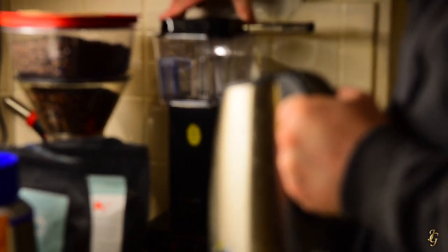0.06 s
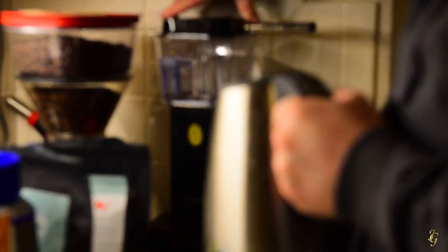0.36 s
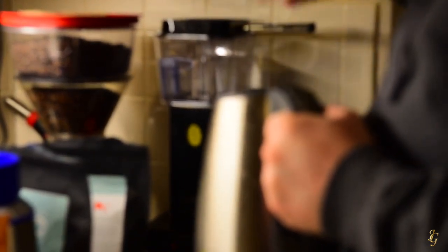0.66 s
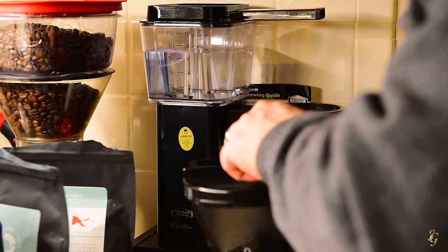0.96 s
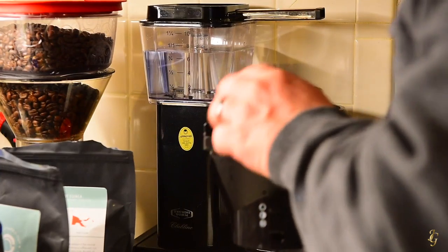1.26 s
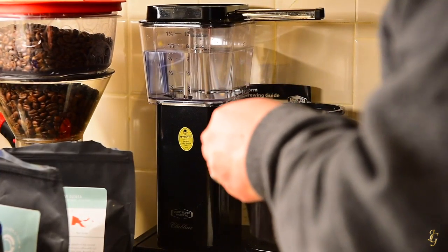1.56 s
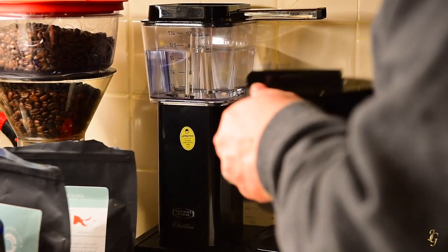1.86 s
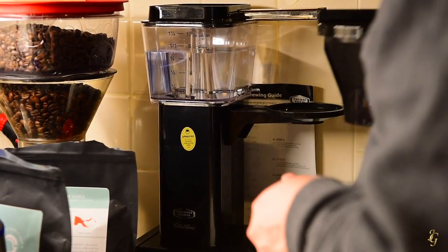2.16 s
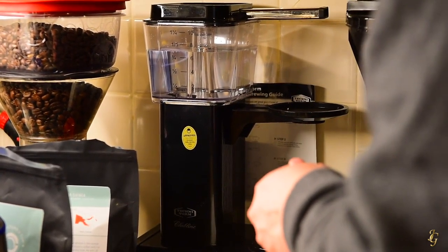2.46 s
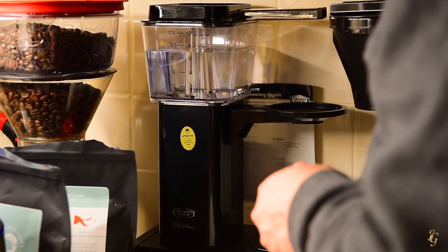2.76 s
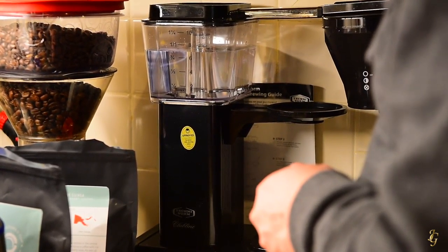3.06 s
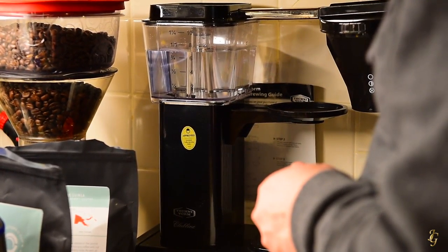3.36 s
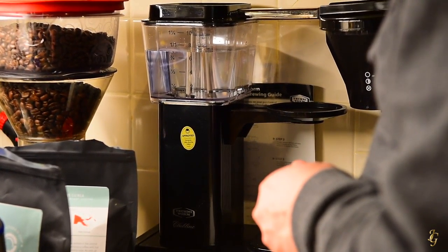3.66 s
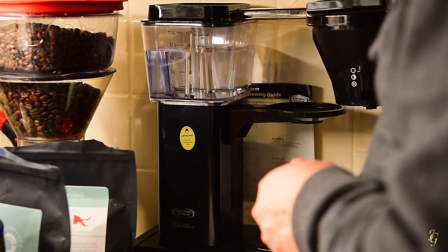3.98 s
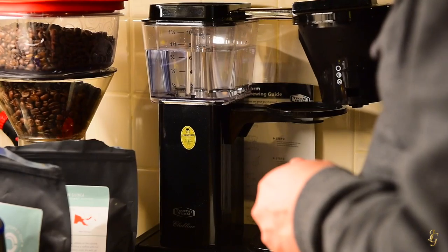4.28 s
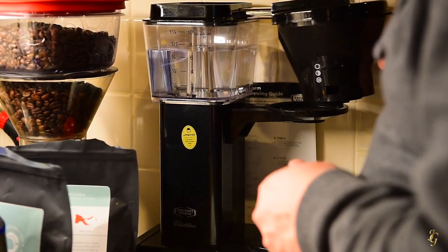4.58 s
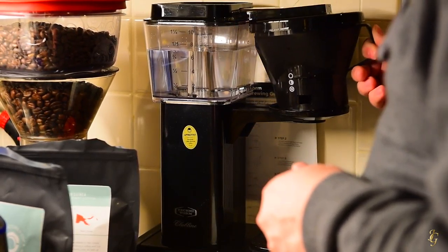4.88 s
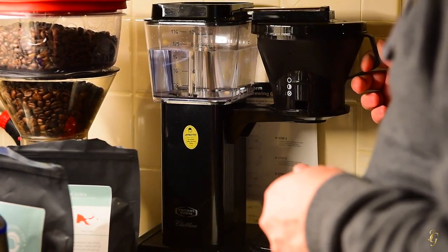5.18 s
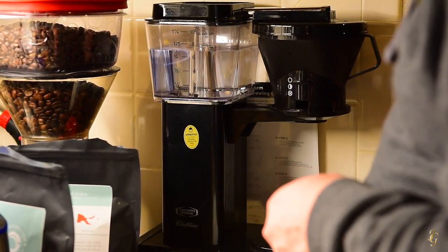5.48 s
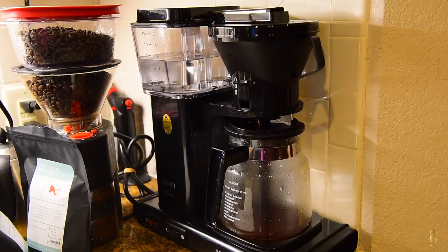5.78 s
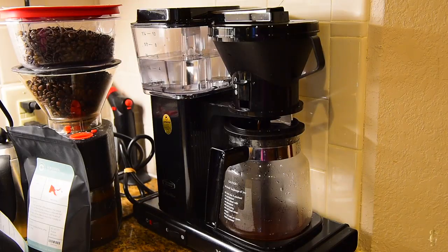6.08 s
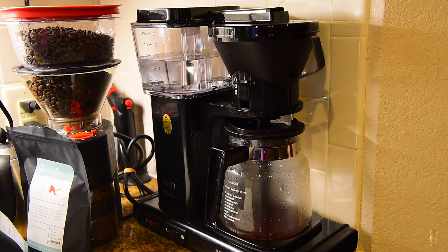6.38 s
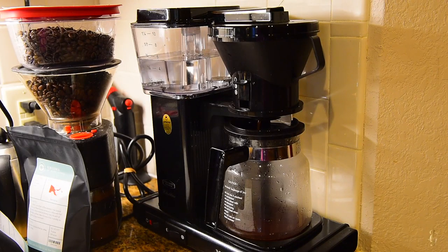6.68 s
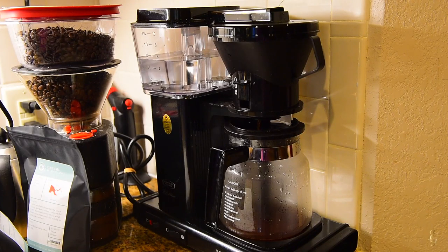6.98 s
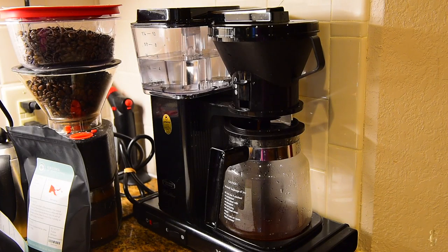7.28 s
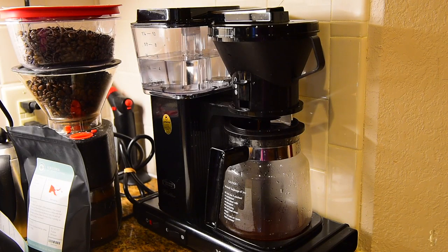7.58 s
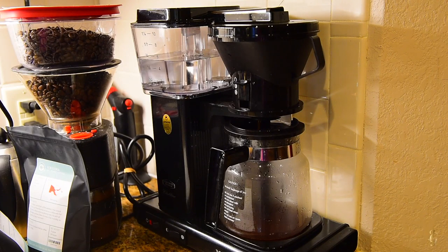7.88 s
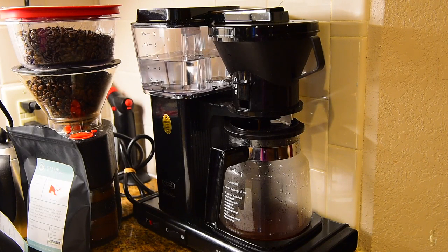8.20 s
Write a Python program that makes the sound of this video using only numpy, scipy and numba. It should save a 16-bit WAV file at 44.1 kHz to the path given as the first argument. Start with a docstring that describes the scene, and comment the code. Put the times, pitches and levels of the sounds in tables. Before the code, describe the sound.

A coffee maker is handled close to the microphone in a small kitchen, with a short tiled echo and a low appliance hum throughout. For the first second or so, a sleeve rubs faintly and a plastic lid gives a few light knocks. From 1.5 to 3 seconds, a hollow plastic part clacks and rattles loudly, densest around 2 seconds, then thinning out. From 3.5 seconds the filter basket slides into place with sharp ticks and fine, slightly ringing scraping, strongest near 4 seconds and fading by 5.4. A soft bump comes at 6 seconds, followed by a small click. At 6.3 seconds a valve snaps open with a bright, spattering hiss of spray lasting under half a second. After a brief gap, a second burst starts near 7 seconds and holds steadily until the end at about 8.4, with the vessel faintly ringing and gurgling.

```python
"""A sleeve rubs and a lid knocks as someone handles a coffee maker, close by in a small kitchen.
A hollow part clacks and rattles, then the filter basket scrapes and ticks into place.
After a soft bump, a valve lets out two hissing bursts of spray that make the vessel ring and gurgle.
Tiled walls add a short echo, and an appliance hums low underneath it all."""
import sys
import numpy as np
from scipy import signal
from scipy.fft import rfft, irfft, next_fast_len
from scipy.io import wavfile
from numba import njit

SR = 44100
rng = np.random.default_rng(int(sys.argv[2]) if len(sys.argv) > 2 else 0)


def waveform_to_disk(signal):
    """Save audio, clipped to [-1, 1], as 16-bit WAV at the path in sys.argv[1]."""
    frames = np.transpose(np.atleast_2d(signal))
    scaled = np.clip(frames, -1, 1) * 32767
    samples = np.round(scaled).astype(np.int16)
    wavfile.write(sys.argv[1], SR, samples)


N = 367794
T = np.arange(N) / SR

# Table levels are relative: the functions add their own gains. A t60 is the time to fade by 60 dB.
# loud clacks of the hollow part: start_s, crack_db, ring_db
PART_CLACKS = [(1.481, 2.5, -17.5), (1.6761, -3, -9.5), (1.6995, -7, -22), (1.7662, -2.5, -14.5),
               (1.8015, -1, -23), (1.8164, -8, -15), (1.8532, -5, -18), (1.9091, -1.5, -9.5),
               (1.942, -11, -16), (1.9954, -6, -9.5), (2.0564, -20, -14), (2.0682, -2, -7),
               (2.1221, -6, -8.5), (2.1664, -15, -12), (2.3078, -11.5, -16), (2.4098, -5.5, -12),
               (2.5187, -18, -17), (2.5316, -5.5, -13), (2.7038, -6, -19), (2.7833, -14.5, -25.5),
               (2.8204, -12, -14.5), (2.8564, -6.5, -22.5), (2.9098, -8, -32), (2.9765, -9.5, -22),
               (2.9884, -11, -23), (3.0385, -18, -31), (3.0834, -17, -24.5), (3.1242, -17, -52),
               (3.2176, -22, -54), (6.1953, -36, -38), (6.2848, -19, -27.5)]
# spells of shaking: start_s, end_s, level_db, fade_db_per_s
PART_SHAKES = [(1.69, 2.136, -15.5, 153), (2.404, 2.58, -33.5, 106), (2.727, 3.02, -23.5, 86)]
# tone of a sharp crack: pitch_hz, level_db
CRACK_TONE = [(200, -51), (1400, -19.5), (2100, -2.5), (3000, -7.5), (3900, 11), (5200, 2), (7000, 4),
              (9500, 2), (11500, -1), (15000, -17)]
# pitches that ring out or are hollowed out in the rattle: pitch_hz, width_hz, gain_db
RATTLE_BANDS = [(2267, 200, 18.5), (3690, 57, 6), (4270, 250, -14), (6150, 94, -14), (9040, 280, 1.5)]
# notes the hollow body rings with: pitch_hz, level_db, t60_s
BODY_NOTES = [(2098, -15.5, 0.083), (2247, 4, 0.034), (2390, 1, 0.025), (2520, -7.5, 0.013),
              (3720, -14, 0.015), (4020, 6, 0.0066), (4430, -34, 0.0218), (5900, -12.5, 0.034),
              (6670, -18, 0.034), (8500, -24, 0.014)]


def hollow_part(crack_db=-6, ring_db=7, rattle_db=-5, detune=0.017):
    """Each clack is a sharp crack plus a short ring of the body; shaking adds bounces and a rattle."""
    shaking = sum(amp(db) * swell(start, end, 0.0034, fade) for start, end, db, fade in PART_SHAKES)
    bounce_s, bounce_db = catches(PART_SHAKES[0][0], PART_CLACKS[-1][0], shaking, spread_db=0.5, count=48)
    bounces = np.transpose([bounce_s, bounce_db + 2, bounce_db - 5])  # more crack, less ring
    clacks = np.vstack([PART_CLACKS, bounces])
    cracks = blows(clacks[:, 0], clacks[:, 1] + crack_db, t60_s=0.051, rise_s=0.00049, patchy_db=5)
    hz, db, t60_s = np.transpose(BODY_NOTES)[:, :, None]
    age, rings = T[:SR // 8], np.zeros((2, N))
    fade = amp(db) * die_away(age, t60_s) * (1 - np.exp(-age / 0.0022))
    for start_s, _, body_db in clacks:
        # each clack is tuned a little differently; high notes reach left and right out of step
        mistune, skew = rng.standard_normal((2, len(hz), 1))
        phase = 2 * np.pi * hz * (1 + detune * mistune) * age
        shift = skew * hz / 5000
        ring = np.array([np.sum(fade * np.sin(phase + side * shift), axis=0) for side in (1, -1)])
        start = int(start_s * SR)
        rings[:, start:start + len(age)] += amp(body_db + ring_db) * ring
    rattle = colour(grains(per_s=180, spread_db=0.5, t60_s=0.04) * shaking, CRACK_TONE, RATTLE_BANDS)
    return colour(cracks, CRACK_TONE) + rings + amp(rattle_db) * rattle


# how hard the basket is pushed: time_s, level_db
BASKET_PUSH = [(3.45, -60), (3.78, -30), (3.79, -17), (4.15, -24.5), (4.81, -26), (5.37, -41), (5.59, -61),
               (5.75, -49.5), (6.0, -74)]
# loud ticks of the basket: start_s, level_db, treble_db
BASKET_TICKS = [(3.532, -33, -32), (3.614, -16, -23.5), (3.6536, -16.5, -39), (3.705, -13.5, -50),
                (3.748, -13.5, -24), (3.7876, -11, -13), (3.813, 4.5, -13), (3.845, -0.5, -20),
                (3.8683, -4, -11), (3.91, 0.5, -14), (3.9402, 1, -10), (3.9763, 1.5, -14),
                (4.0405, -1, -14.5), (4.1553, -6.5, -18), (4.3231, -28, -14.5), (4.3562, -5.5, -16),
                (4.523, -5.5, -19), (4.5872, -8, -22), (4.784, -6, -20), (4.9034, -10.5, -20.5),
                (5.133, -28, -19), (5.2133, -12, -28), (5.2835, -15, -29), (5.351, -18, -32),
                (5.7522, -35, -33.5), (5.933, -41, -36)]
# tones of a tick, its bright snap and the scraping: pitch_hz, level_db
TICK_TONE = [(200, -33), (1000, -38.5), (2000, -8), (3200, -3), (5500, 2.5), (7200, -1), (9000, -12),
             (15000, -55)]
SNAP_TONE = [(2000, -43), (6500, -6.5), (9200, 5.5), (12500, 2.5), (15500, -14)]
SCRAPE_TONE = [(200, -39), (1000, -12.5), (2000, -6.5), (3200, -10.5), (4200, -0.5), (7000, -1.5),
               (9400, 3.5), (12500, -0.5), (15500, -12.5)]
# pitches that stand out in a tick: pitch_hz, width_hz, lift_db
TICK_PEAKS = [(2220, 92, 11), (2650, 300, 5.2), (3650, 41, 5.9), (4120, 210, 5.6), (5600, 730, 4.4),
              (6430, 81, 8.7)]


def basket(tick_db=-7, snap_db=4, grit_db=-5.5, ping_db=-8, glide_start_s=3.7):
    """The sliding basket catches in sharp ticks and scrapes finely between them."""
    push = amp(np.interp(T, *np.transpose(BASKET_PUSH), left=-120, right=-120))
    catch_s, catch_db = catches(glide_start_s, BASKET_TICKS[-1][0], push, spread_db=7.5, count=44)
    light_ticks = np.transpose([catch_s, catch_db + 11, catch_db + 2])
    times, body_db, treble_db = np.vstack([BASKET_TICKS, light_ticks]).T
    ticks = blows(times, body_db + tick_db, t60_s=0.031, rise_s=0.00096, patchy_db=2.5)
    snaps = blows(times, treble_db + snap_db, t60_s=0.019, rise_s=0.0001, patchy_db=1.5)
    grit = amp(grit_db) * grains(per_s=390, spread_db=7.5, t60_s=0.012)
    tinkle = amp(ping_db) * pings(per_s=4000, spread_db=3.5, t60_s=0.041)
    scrape_peaks = [(2180, 240, 12.5), (2810, 350, 4), (3780, 440, 5.8)]
    scrape = colour((grit + tinkle) * push, SCRAPE_TONE, scrape_peaks)
    return colour(ticks, TICK_TONE, TICK_PEAKS) + colour(snaps, SNAP_TONE) + scrape + basket_wall(push)


# pitches the basket wall sings at: pitch_hz, width_hz, lift_db
SINGING_PEAKS = [(2166, 156, 19.2), (3950, 110, 16), (4814, 200, 11), (5800, 410, 18), (8300, 570, 5.9)]


def basket_wall(push, level_db=-24, seated_s=4.8, rise_db_per_s=26):
    """Light rubbing makes the basket wall sing, more freely as it nears its seat."""
    rubbing = push ** 0.53 * amp(level_db - rise_db_per_s * np.maximum(seated_s - T, 0))
    tone = [(300, -12), (1500, 7), (6000, 2.5), (11000, 8), (15000, -7)]
    return colour(grains(per_s=110, spread_db=1.5, t60_s=0.011) * rubbing, tone, SINGING_PEAKS)


# bursts from the valve: open_s, close_s, level_db, fall_db_per_s, closing_fade_s
SPRAY_BURSTS = [(6.333, 6.721, -7.5, 6, 0.053), (6.946, 8.4, -8.5, 1.08, .05)]
# tone of the jet: pitch_hz, level_db
JET_TONE = [(30, -24), (100, -23), (280, -30.5), (450, -19), (900, -9.5), (1600, -9), (2500, -2.5),
            (4000, 1.5), (7500, 3.5), (10300, 4.5), (12000, -3.5), (14000, -5), (15500, -13.5)]
# pitches the vessel lifts in the hiss: pitch_hz, width_hz, lift_db
HISS_PEAKS = [(530, 71, 7), (614, 49, 1.4), (1940, 54, 10.6), (2850, 31, 6.1), (3900, 170, 2.8),
              (4830, 78, 1), (5480, 66, 2.7), (5940, 160, 2.5), (9430, 150, 1.5)]


def spray(seep_s=6.064, seep_db=-56.5, seep_db_per_s=58, flutter_db=1.33, spatter_db=-7, ring_db=-3.5):
    """The valve seeps, then snaps open; the jet hisses and spatters, fading as the pressure drops."""
    seep = (T > seep_s) * (T < SPRAY_BURSTS[0][0]) * amp(seep_db + seep_db_per_s * (T - seep_s))
    flow = np.zeros(N)
    for open_s, close_s, db, fall_db_per_s, fade_s in SPRAY_BURSTS:
        age = np.maximum(T - open_s, 0)
        opening = 1 - np.exp(-age / 0.00044)
        closing = np.exp(-np.maximum(T - close_s, 0) / fade_s)
        flow += opening * amp(db - fall_db_per_s * age) * closing
    hiss = air() * amp(flutter_db * wander(per_s=32))
    drops = amp(spatter_db) * grains(per_s=2500, spread_db=2.5, t60_s=0.012)
    jet = (flow + seep) * colour(unit(hiss + drops), JET_TONE, HISS_PEAKS)
    return jet + amp(ring_db) * flow ** 0.76 * vessel()


# notes of the vessel's mouth, air space, wall and whistle: pitch_hz, width_hz, level_db, growth_db_per_s
VESSEL_NOTES = [(586, 98, -26, -2.5), (1263, 113, -33, 5), (1884, 170, -20.5, 2), (3305, 145, -20.5, 4)]
# air pockets where the jet lands: start_s, length_s, from_hz, to_hz, level_db
AIR_POCKETS = [(6.38, 0.2, 990, 1030, -20.5), (6.522, 0.21, 1960, 2200, -16.5),
               (6.956, 0.35, 960, 1210, -20.5), (8.134, 0.27, 830, 810, -17.5)]


def vessel():
    """The vessel's notes grow or fade as it fills, and air pockets add short gliding gurgles."""
    filling_s = np.maximum(T - SPRAY_BURSTS[0][0], 0)
    out = sum(amp(db + growth * filling_s) * breathy_note(hz, width)
              for hz, width, db, growth in VESSEL_NOTES)
    for start_s, length_s, from_hz, to_hz, db in AIR_POCKETS:
        progress = np.clip((T - start_s) / length_s, 0, 1)
        pitch_hz = from_hz + (to_hz - from_hz) * progress
        out += amp(db) * np.sin(np.pi * progress) * breathy_note(pitch_hz, width_hz=110)
    return out


# knocks on the lid and casing: start_s, contact_db, ring_db
LID_KNOCKS = [(0.36, -30.5, -60), (0.473, -30, -62), (0.5303, -13.5, -27), (0.805, -27, -49),
              (0.972, -17.5, -40), (1.154, -24.5, -42), (2.353, -26, -34.5), (3.355, -30, -53),
              (3.585, -17, -41)]
# tone of a knock: pitch_hz, level_db
KNOCK_TONE = [(150, -33), (550, -20), (800, -3), (1050, -9), (1700, -5.5), (2300, -10.5), (3200, -8),
              (5000, -11), (9000, -20), (15000, -29)]
# pitches that stand out in a knock: pitch_hz, width_hz, lift_db
KNOCK_PEAKS = [(795, 100, 2.3), (980, 100, 2.8), (1400, 87, 3.6), (2180, 370, 7.7), (3520, 600, 2.9)]
# notes the lid rings with: pitch_hz, level_db, t60_s
LID_NOTES = [(778, -8.5, 0.096), (1028, -0.5, 0.097), (1210, -11, 0.07), (1433, -6, 0.074),
             (2050, -5, 0.046), (3520, -10, 0.04)]


def lid(knock_db=-5):
    """Each knock is a short dull contact plus the hollow ring of the lid."""
    times, contact_db, ring_db = np.transpose(LID_KNOCKS)
    contacts = blows(times, contact_db + knock_db, t60_s=0.036, rise_s=0.00061, patchy_db=2.5)
    age, taps = T[:SR // 4], np.zeros(N)
    taps[(times * SR).astype(int)] = amp(ring_db)
    ring = sum(amp(db) * np.sin(2 * np.pi * hz * age) * die_away(age, t60) for hz, db, t60 in LID_NOTES)
    return colour(contacts, KNOCK_TONE, KNOCK_PEAKS) + signal.fftconvolve(taps, ring)[:N]


# soft bumps on the counter: start_s, thud_db, brush_db
COUNTER_BUMPS = [(3.581, -27.5, -50), (6.025, -28.5, -17)]
# tone of a thud through the counter: pitch_hz, level_db
THUD_TONE = [(30, -10), (60, -7), (135, 1.5), (250, -14.5), (700, -14), (3000, -48)]


def counter(valve_db=-29):
    """Bumps and the opening valve thud through the counter; a bump also brushes its surface."""
    times, thud_db, brush_db = np.transpose(COUNTER_BUMPS)
    thuds = blows(times, thud_db, t60_s=0.15, rise_s=0.024, patchy_db=2)
    openings = [burst[0] for burst in SPRAY_BURSTS]
    thumps = blows(openings, [valve_db] * len(openings), t60_s=0.36, rise_s=0.047, patchy_db=2.5)
    brush = blows(times, brush_db, t60_s=0.15, rise_s=0.023, patchy_db=1.5)
    brush_tone = [(200, -6), (900, -3.5), (2200, -3), (5000, -1), (10000, -2.5), (15000, -18)]
    return colour(thuds + thumps, THUD_TONE) + colour(brush, brush_tone)


# strokes of the sleeve and hand: start_s, end_s, rub_db, hiss_db
STROKES = [(0.128, 0.94, -54, -54.5), (0.953, 1.036, -36, -46), (1.082, 1.153, -39.5, -52),
           (1.27, 1.834, -39, -59), (2.025, 3.09, -45, -48), (3.28, 5.293, -57, -56),
           (5.602, 5.922, -63, -57)]
# tones of rubbing cloth and of skin on plastic: pitch_hz, level_db
CLOTH_TONE = [(100, -23), (500, -4), (1200, 3), (2000, -7), (3500, -8.5), (6000, -18), (10000, -11.5),
              (15000, -18)]
SKIN_TONE = [(500, -24), (2500, 1), (7000, 5), (11000, -6), (15000, -17)]


def sleeve_and_hand(uneven_db=3):
    """Cloth rustles unevenly as it rubs, and skin hisses finely over plastic."""
    rub, hiss = sum(amp([[rub_db], [hiss_db]]) * swell(start, end, attack_s=0.011, fade_db_per_s=69)
                    for start, end, rub_db, hiss_db in STROKES)
    cloth = grains(per_s=350, spread_db=1.5, t60_s=0.064) * rub * amp(uneven_db * wander(per_s=18))
    skin = grains(per_s=250, spread_db=2, t60_s=0.03) * hiss
    return colour(cloth, CLOTH_TONE) + colour(skin, SKIN_TONE)


# tone of the room's background noise: pitch_hz, level_db
KITCHEN_TONE = [(15, -70), (25, -30), (99, -4), (156, -4.5), (221, 1.5), (267, -6), (349, 2.5), (509, -9.5),
                (648, -8), (1660, -26), (7500, -30.5), (10900, -31), (15000, -42)]
# notes in the appliance hum: pitch_hz, level_db
HUM_NOTES = [(53.8, -70), (107.7, -58.5), (161.5, -60.5), (210.5, -55), (215, -76), (349.9, -91.5)]


def kitchen(noise_db=-48, waver_db=1):
    """Low room noise lies under a wavering appliance hum."""
    hum = np.zeros(N)
    for hz, db in HUM_NOTES:
        strength = np.sqrt(2) * amp(db + waver_db * wander(per_s=3.56))
        hum += strength * np.sin(2 * np.pi * hz * T + 0.5 * wander(per_s=1.9))
    return amp(noise_db) * colour(air(), KITCHEN_TONE) + hum


# how long the room rings: pitch_hz, t60_s
ECHO_TIMES = [(200, 0.32), (2000, 0.53), (6000, 0.35), (14000, 0.22)]


def wall_echo(x, build_s=0.0047):
    """Tiled walls send back a short, blurred echo that loses its treble first."""
    hz, age, noise = signal.stft(rng.standard_normal((2, SR // 2)), SR, nperseg=256)
    fade = die_away(age, over_hz(ECHO_TIMES, hz)[:, None]) * (1 - np.exp(-age / build_s))
    tail = signal.istft(noise * fade, SR)[1]
    tail /= np.linalg.norm(tail, axis=1, keepdims=True)
    return signal.fftconvolve(x, tail, axes=1)[:, :N]


# how alike left and right are: pitch_hz, likeness_0_to_1
STEREO_LIKENESS = [(60, 0.92), (250, 0.93), (550, 0.84), (1100, 0.9), (3100, 0.55), (6800, 0.2), (15000, 0)]


def air():
    """Stereo noise, alike on both sides in the bass and unrelated in the treble."""
    size = next_fast_len(N)
    mid, side = rfft(rng.standard_normal((2, size)))
    alike = np.clip(over_hz(STEREO_LIKENESS, np.fft.rfftfreq(size, 1 / SR)), 0, 1)
    mid, side = mid * np.sqrt(1 + alike), side * np.sqrt(1 - alike)
    return unit(irfft([mid + side, mid - side], size)[:, :N])


def blows(times, levels_db, t60_s, rise_s, patchy_db):
    """Noisy hits that swell quickly and die away, each with its own random tone."""
    age, noise, out = T[:SR // 5], air(), np.zeros((2, N))
    hz = np.fft.rfftfreq(len(age), 1 / SR)
    shape = (1 - np.exp(-age / rise_s)) * die_away(age, t60_s)
    for start_s, db in zip(times, levels_db):
        span = slice(int(start_s * SR), int(start_s * SR) + len(age))
        tint = amp(patchy_db * np.interp(hz, np.linspace(0, SR / 2, 48), rng.standard_normal(48)))
        out[:, span] += amp(db) * shape * irfft(rfft(noise[:, span]) * unit(tint), len(age))
    return out


def catches(start_s, end_s, effort, spread_db, count):
    """Times and levels of small, unevenly spaced hits whose strength follows the effort."""
    place, size = rng.random((count, 2)).T
    times = start_s + (end_s - start_s) * (np.arange(count) + place) / count
    return times, 20 * np.log10(np.interp(times, T, effort) + 1e-9) + spread_db * (2 * size - 1)


def grains(per_s, spread_db, t60_s):
    """Many tiny contacts of uneven size, each a brief crackle."""
    sizes = (rng.random(N) < per_s / SR) * amp(spread_db * np.minimum(rng.exponential(size=N), np.pi))
    power = signal.lfilter([1], [1, -die_away(1 / SR, t60_s) ** 2], sizes ** 2 + 1e-12)
    return unit(np.sqrt(power) * air())


def pings(per_s, spread_db, t60_s, notes=36):
    """Tiny contacts that each ring one high note, a little differently on the left and right."""
    out = np.zeros((2, N))
    decay = die_away(1 / SR, t60_s)
    for hz in np.linspace(2500, 15000, notes) + 100 * rng.standard_normal(notes):
        taps = np.zeros((2, N))
        count = int(per_s * N / SR / notes)
        places = rng.integers(N, size=count)
        size_db = spread_db * np.minimum(rng.exponential(size=count), np.pi)
        for channel in taps:
            channel[places - rng.integers(2, size=count)] = amp(size_db + 2 * rng.standard_normal(count))
        feedback = [1, -2 * decay * np.cos(2 * np.pi * hz / SR), decay ** 2]
        out += signal.lfilter([1, 0, -1], feedback, taps + 1e-18)
    return unit(out)


def breathy_note(pitch_hz, width_hz, flutter_db=1.4, drift=0.0083):
    """Noise narrowed to one note that flutters in level and drifts slightly in pitch."""
    centre_hz = pitch_hz * (1 + drift * wander(per_s=6))
    band = resonate(rng.standard_normal(N), centre_hz, float(width_hz))
    note = resonate(band, centre_hz, float(width_hz))
    return unit(note) * amp(flutter_db * wander(per_s=25))


@njit
def resonate(x, hz, width_hz):
    """Let through only a band of sound around a pitch that may move."""
    out, band, low = np.empty(len(x)), 0., 0.
    for i in range(len(x)):
        tuning, damping = np.tan(np.pi * hz[i] / SR), width_hz / hz[i]
        swing = (band + tuning * (x[i] - low)) / (1 + tuning * (tuning + damping))
        band, low, out[i] = 2 * swing - band, low + 2 * tuning * swing, damping * swing
    return out


def colour(x, tone, bands=(), size=4096):
    """Shape a sound with a broad tone curve and narrow peaks or dips; white noise keeps its power."""
    hz = np.fft.rfftfreq(size, 1 / SR)
    db = over_hz(tone, hz) + sum(gain / (1 + (2 * (hz - at) / width) ** 2) for at, width, gain in bands)
    # this fold makes the filter ring after a hit, never before it
    cepstrum = irfft(np.log(amp(db)))
    cepstrum[1:size // 2] *= 2
    cepstrum[size // 2 + 1:] = 0
    response = irfft(np.exp(rfft(cepstrum)))
    return signal.fftconvolve(x, response[None] / np.linalg.norm(response), axes=1)[:, :N]


def swell(start_s, end_s, attack_s, fade_db_per_s):
    """Loudness of one movement: it rises quickly, holds, then fades."""
    rise = 1 - np.exp(-np.maximum(T - start_s, 0) / attack_s)
    return rise * amp(-fade_db_per_s * np.maximum(T - end_s, 0))


def die_away(age_s, t60_s):
    """A fade that falls 60 dB every t60_s."""
    return np.exp(-np.log(1000) * age_s / t60_s)


def wander(per_s):
    """A smooth random wobble of typical size 1."""
    knots = rng.standard_normal(int(N / SR * per_s) + 3)
    return unit(np.interp(T * per_s, np.arange(len(knots)), knots))


def over_hz(rows, hz):
    """Read between the rows of a (pitch_hz, value) table, with octaves evenly spaced."""
    points, values = np.transpose(rows)
    return np.interp(np.log(hz + 1), np.log(points), values)


def amp(db):
    """Turn decibels into a multiplier."""
    return 10 ** (np.asarray(db) / 20)


def unit(x):
    """Scale to an average power of 1."""
    return x / np.sqrt(np.mean(x ** 2))


def scene(parts_echo_db=-8, spray_echo_db=-12):
    """The parts and the spray, heard close up and off the walls, over the kitchen's hum."""
    parts = hollow_part() + basket() + lid() + sleeve_and_hand() + counter()
    jet = spray()
    return parts + jet + wall_echo(amp(parts_echo_db) * parts + amp(spray_echo_db) * jet) + kitchen()


def record(dry, bright_db=-5, bright_hz=9420.0, top_hz=15650):
    """The left microphone adds brightness; the loudest peaks are clipped and the top treble is cut."""
    left, right = dry
    left = left + amp(bright_db) * resonate(left, np.full(N, bright_hz), width_hz=1150.0)
    clipped = np.clip([left, right], -1, 1)
    return signal.sosfilt(signal.ellip(10, 0.1, 70, top_hz, fs=SR, output="sos"), clipped)


dry = scene()
out = record(dry)
waveform_to_disk(out)
```